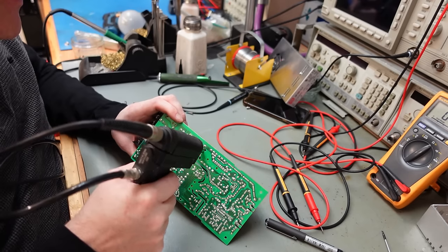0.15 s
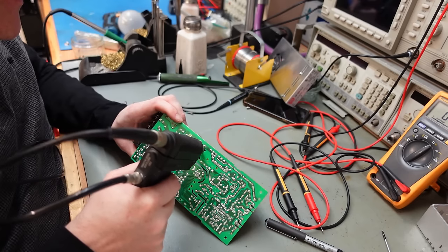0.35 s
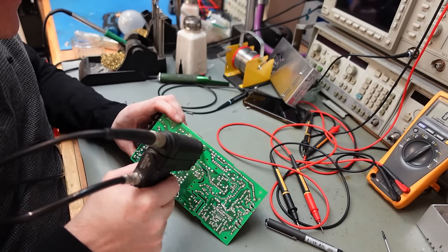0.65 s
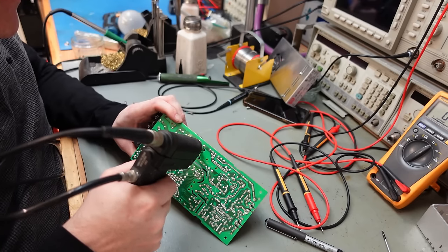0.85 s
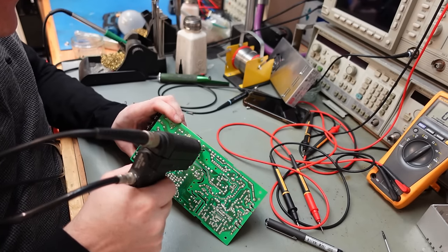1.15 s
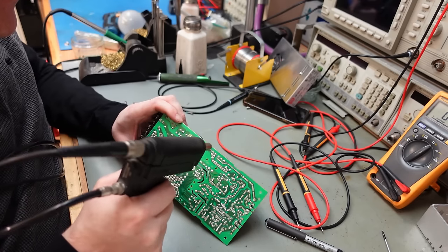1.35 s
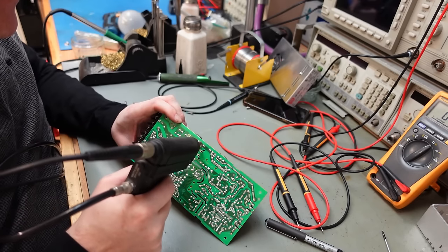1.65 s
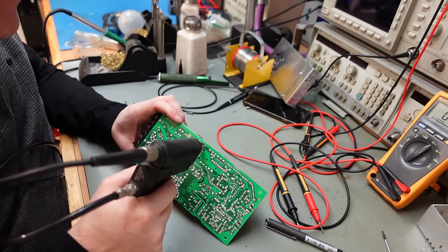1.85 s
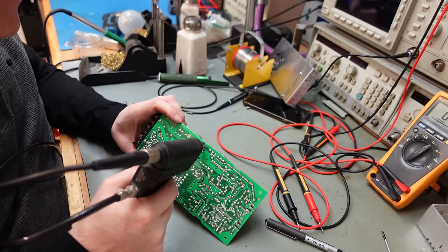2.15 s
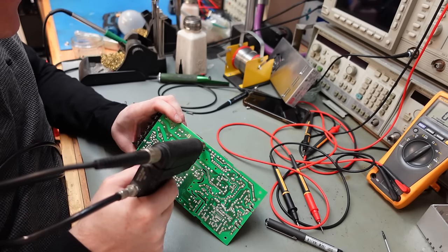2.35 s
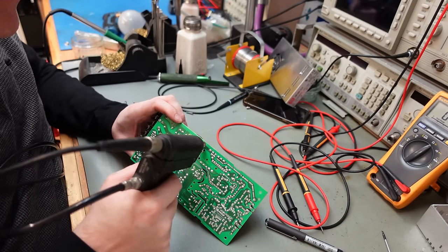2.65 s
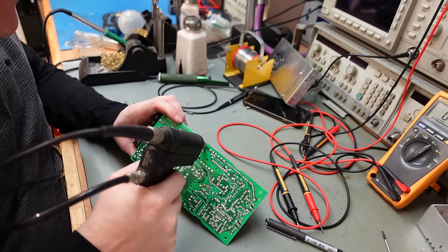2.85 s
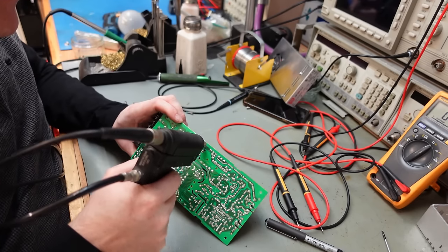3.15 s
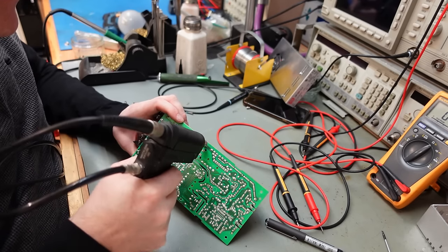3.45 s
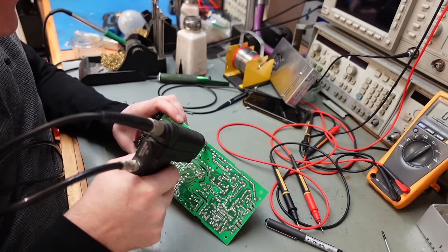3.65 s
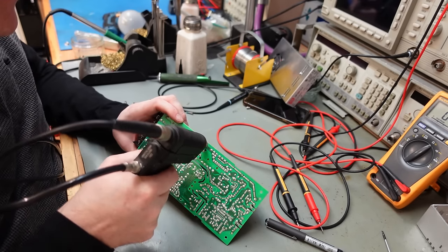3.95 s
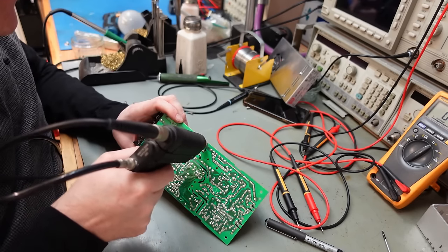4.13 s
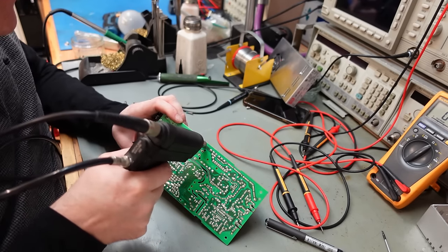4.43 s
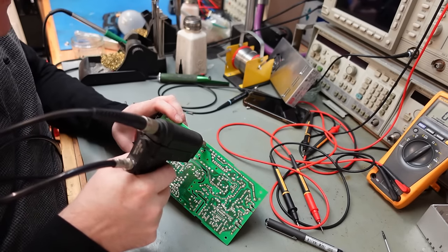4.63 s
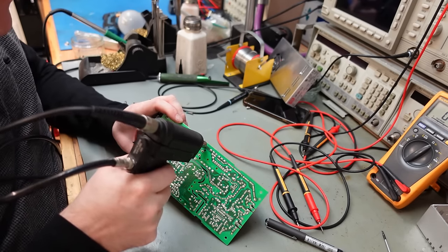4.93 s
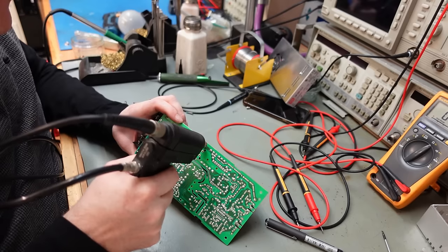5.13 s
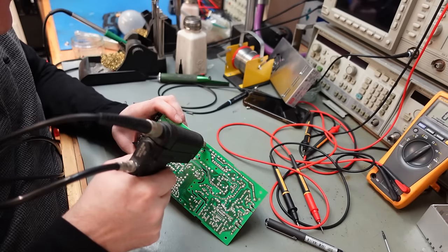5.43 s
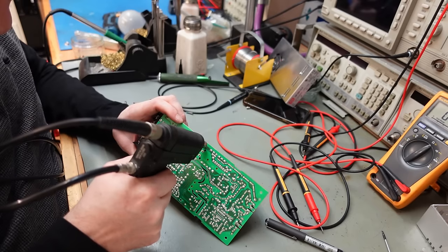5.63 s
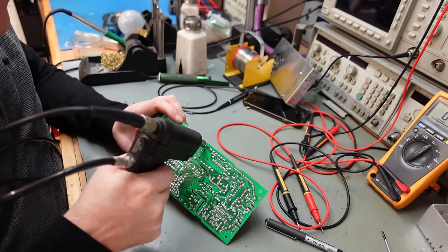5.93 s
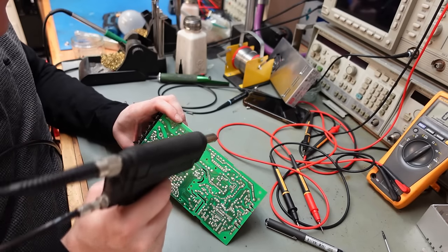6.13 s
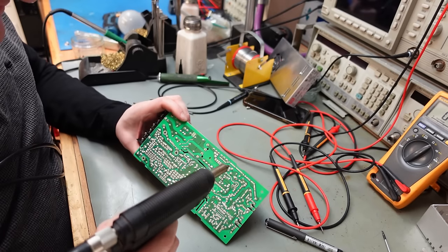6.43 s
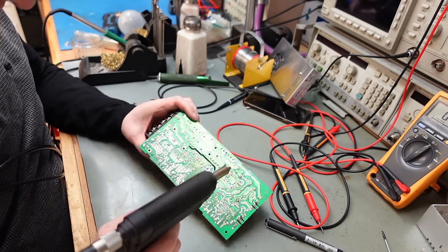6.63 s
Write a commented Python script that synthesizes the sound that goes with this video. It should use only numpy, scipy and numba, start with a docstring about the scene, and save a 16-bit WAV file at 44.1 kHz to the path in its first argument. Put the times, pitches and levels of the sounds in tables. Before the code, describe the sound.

An air-driven desoldering gun taps lightly on a circuit board, then its valve pops open and air hisses loudly for about half a second before popping shut. Scattered small clicks and scrapes follow. After a sharper tap comes a second, slightly longer hiss, then a few more clicks and a brief sleeve rustle. The sound is close, in a small workshop with faintly humming equipment.

```python
"""Desoldering gun at a workbench

An air-driven desoldering gun taps and scrapes on a circuit board, and a sleeve rustles as it moves.
Twice the valve pops open, air hisses through the gun, and the valve pops shut with the hose ringing.
Bench equipment hums faintly in the small workshop. A limiter holds the loud hiss down."""
import sys
import numpy as np
from scipy import signal
from scipy.fft import rfft, irfft
from scipy.io import wavfile
from scipy.ndimage import uniform_filter1d
from numba import njit

SR = 44100
rng = np.random.default_rng(int(sys.argv[2]) if len(sys.argv) > 2 else 0)


def wav_out(sig):
    """Save sig, one row per channel (or a flat mono array), as 16-bit PCM at SR to the path in sys.argv[1]."""
    wavfile.write(sys.argv[1], SR, np.round(np.clip(np.atleast_2d(sig).T, -1, 1) * 32767).astype(np.int16))


N = 299439
TIME = np.arange(N) / SR
FREQ = np.maximum(np.fft.rfftfreq(N, 1 / SR), 1)

# Tone of the workshop's steady air noise: f/Hz, relative level/dB
FAN_SPECTRUM = [(20, -7.5), (50, 2.5), (130, -1.5), (330, -3), (560, -6.5), (820, -6), (1400, -9.5),
                (1590, -3.5), (1750, -12.5), (3500, -15.5), (4400, -20.5), (7500, -20.5), (10000, -25),
                (15500, -27)]
# Mains hum and fan whine of the bench equipment: f/Hz, level/dB
HUM_TONES = [(199.5, -65), (301.5, -68), (336, -62.5), (499, -68), (699.8, -64.5), (850.6, -67),
             (2094, -69.5), (2293, -77), (2891, -66.5)]
# Tone of sliding cloth: f/Hz, relative level/dB
CLOTH_SPECTRUM = [(200, 1.5), (800, 4), (2100, 5.5), (3600, 3), (5000, -10), (9000, -14.5), (15500, -25.5)]
# Slides of the sleeve and hose: middle t/s, half length/s, level/dB
SLEEVE_MOVES = [(0.137, 0.064, -53), (0.59, 0.14, -50.5), (4.985, 0.06, -52.5), (6.67, 0.14, -49),
                (6.79, 0.046, -35)]
# Knocks of the nozzle, trigger and fingers:
# t/s, relative level/dB, most boosted f/Hz, tick against the knock/dB, thump against the knock/dB
KNOCKS = [(0.006, -22, 3220, -25, -7), (0.261, -23.5, 2470, -23, -11), (0.387, -18.5, 2250, -33, -13.5),
          (0.525, -11.5, 2400, -24, -17.5), (0.542, -12, 2040, -26, -23), (0.615, -18, 2450, -33, -17.5),
          (0.642, -19.5, 3690, -22, -15), (1.772, -27.5, 1780, -28, -28), (1.872, -36, 1900, -18, -13),
          (1.887, -27, 1990, -33, -25), (1.908, -30.5, 1840, -28, -12), (2.246, -12, 2050, -22, -17),
          (2.318, -30, 2300, -30, -6), (2.386, -19.5, 2070, -29.5, -16), (2.429, -32.5, 1730, -27, -1.5),
          (2.76, -46, 3300, -8, -12), (3.62, -44.5, 3200, -8, -16), (4.294, -40, 3300, -11, -8),
          (4.836, -18, 1950, -15, -9), (4.844, -8.5, 3280, -3.5, -22.5), (5.052, -31.5, 2170, -13.5, -2.5),
          (5.13, -28, 1730, -11, -9.5), (5.142, -28.5, 2860, -0.5, -9), (5.382, -31, 2400, -34, -28),
          (6.473, -28.5, 1000, -38, -32), (6.546, -33.5, 3050, -41, -27), (6.601, -55, 7500, 25.5, -25),
          (6.706, -17, 3630, -14, -37), (6.7374, -13, 1360, -40, -20)]
# Resonances of the board and gun body: f/Hz, width/Hz, relative level/dB
BOARD_MODES = [(430, 150, 10.5), (860, 640, 9.5), (1535, 210, 0), (1735, 110, 3.5), (1960, 170, -3),
               (2147, 130, 5.5), (2520, 37, 2), (3290, 590, -3.5), (4080, 450, -9.5), (5600, 430, -33.5),
               (7100, 270, -4.5)]
# Tone of the nozzle ticking on solder: f/Hz, relative level/dB
TICK_SPECTRUM = [(1500, -15), (3500, -11), (5200, -1.5), (6700, -4), (8600, -3.5), (10500, -9),
                 (15500, -15)]
# Trigger pulls: valve opens t/s, valve shuts t/s, hiss level/dB, change over the pull/dB
TRIGGER_PULLS = [(0.835, 1.4385, -5.5, -0.5), (5.3886, 6.1384, -2, -3.5)]
# Pressure pulses of the valve, opening then shutting:
# f/Hz, level/dB, half length/s, low push against the pulse/dB, hose ring against the pulse/dB
VALVE_POPS = [(483, 1.5, 0.0014, -17, -15.5), (540, 10.5, 0.00098, -38.5, -21.5)]
# Tone of the ringing hose: f/Hz, relative level/dB
HOSE_SPECTRUM = [(30, -40), (150, -21.5), (450, -11), (850, 4), (1600, -18.5), (5000, -46.5)]
# Broad tone of the air jet: f/Hz, relative level/dB
JET_SPECTRUM = [(200, -32.3), (300, -20.9), (480, -10.6), (800, -6.9), (1300, -7.2), (1800, -1.3),
                (3000, 0.0), (4300, -4.2), (5400, -4.2), (6500, -4.0), (7500, -3.4), (8600, -14.2),
                (10500, -7.0), (15600, -9.7)]
# Resonances of the air path, which change with the grip:
# f/Hz, width/Hz, boost in first pull/dB, boost in second pull/dB
AIR_RESONANCES = [(520, 80, 5.3, 6.7), (700, 130, 3.8, 5.2), (1040, 210, 7.6, 6.7), (1580, 250, 6.4, 6.0),
                  (2000, 90, 4.5, 2.8), (2220, 40, 2.8, 2.4), (2570, 70, 7.0, 5.2), (2980, 160, 4.4, 3.3),
                  (3200, 90, 5.8, 5.9), (3340, 50, 5.9, 0.7), (3470, 180, 9.6, 10.6),
                  (3710, 220, -1.6, 2.9), (3760, 310, 11.0, 8.4), (4480, 160, 2.9, 4.1),
                  (4890, 50, 6.0, 6.9), (5860, 290, 2.6, 5.7), (6150, 370, 6.6, 7.0), (6700, 390, 5.2, 5.5),
                  (7100, 90, 8.9, 3.5), (7460, 410, 3.3, 4.6), (8350, 410, 11.0, 5.7),
                  (9120, 360, 8.9, 10.9), (9640, 470, 11.0, 5.2), (9790, 430, 2.4, 11.0),
                  (10210, 500, 6.5, -3.0), (11070, 150, 6.6, 5.9), (11520, 140, 3.6, 6.7),
                  (11760, 260, 4.5, 8.3), (12390, 200, 5.8, 2.3), (15150, 270, -3.0, 4.8)]
# The nozzle rim whistles high, then an octave lower, as each pull ends:
# time before the valve shuts/s, half length/s, f/Hz, level against the hiss/dB
RIM_WHISTLES = [(0.075, .025, 9750, -12), (0.036, 0.026, 4905, -11.5)]
# How long the workshop echoes: f/Hz, t60/s (t60 is the time to fade by 60 dB)
ROOM_DECAY = [(150, .3), (600, .28), (2000, .28), (4000, .38), (8000, .38), (15000, .24)]


def undb(db):
    """Turn decibels into a gain."""
    return 10 ** (np.asarray(db) / 20)


def unit(x):
    """Scale to an average strength (rms) of 1."""
    return x / np.sqrt(np.mean(x ** 2))


def contour(points, hz=FREQ):
    """Join (Hz, value) points on a log-frequency axis."""
    at, value = np.transpose(points)
    return np.interp(np.log(hz), np.log(at), value)


def bell(centre, width, hz=FREQ):
    """Power curve of one resonance, 1 at its centre."""
    return 1 / (1 + (2 * (hz - centre) / width) ** 2)


def swell(at, half_s):
    """Smooth rise and fall around one moment."""
    return np.exp(-((TIME - at) / half_s) ** 2)


def noise(db):
    """Noise of rms 1 with the given spectrum."""
    return unit(irfft(rfft(rng.standard_normal(N)) * undb(db), N))


def wander(rate_hz):
    """Smooth random drift, about 1 in size."""
    return noise(-20 * np.log10(1 + (FREQ / rate_hz) ** 2))


def blow(fade, db):
    """A fading burst of noise rings with the given spectrum, never ahead of the hit."""
    cepstrum = irfft(np.log(undb(db)))
    half = len(fade) // 2
    cepstrum[1:half] *= 2
    cepstrum[half + 1:] = 0
    burst = rng.standard_normal(len(fade)) * fade
    ringing = irfft(rfft(burst) * np.exp(rfft(cepstrum)))
    return unit(ringing) * np.sqrt(np.mean(fade ** 2))


@njit
def follow(x, rise_s, fall_s):
    """Track the level of a sound, with separate times for rising and falling."""
    attack, release = 1 / (rise_s * SR), 1 / (fall_s * SR)
    out, level = np.empty(len(x)), 0.
    for i in range(len(x)):
        now = abs(x[i])
        level += (now - level) * (attack if now > level else release)
        out[i] = level
    return out


def workshop(air_db=-50.5, drift_db=0.2, waver_db=0.6):
    """Fans blow evenly while the equipment hums on faint, nearly steady tones."""
    air_gain = undb(air_db + drift_db * wander(6))
    air = noise(contour(FAN_SPECTRUM)) * air_gain
    hum = 0
    for hz, db in HUM_TONES:
        peak = np.sqrt(2) * undb(db + waver_db * wander(5))
        hum += peak * np.sin(2 * np.pi * (hz * TIME + rng.random()))
    return air + hum


def room(x, size=22050, gap_s=0.0061, clutter_db=-13, clutter_t60=0.063, tail_db=-21.5):
    """Sound bounces quickly off the cluttered bench, then leaves a faint tail from the walls."""
    t, hz = np.arange(size) / SR, np.maximum(np.fft.rfftfreq(size, 1 / SR), 1)
    scatter, tail = rfft(rng.standard_normal(size)), 0
    centres, t60s = np.transpose(ROOM_DECAY)
    for share, t60 in zip(np.eye(len(ROOM_DECAY)), t60s):
        band = np.interp(np.log(hz), np.log(centres), share)
        tail += irfft(scatter * band, size) * undb(-60 * t / t60)
    build_up = 1 - np.exp(-(t / gap_s) ** 2)
    clutter = rng.standard_normal(size) * undb(-60 * t / clutter_t60)
    echoes = undb(clutter_db) * unit(clutter * build_up) + undb(tail_db) * unit(tail * build_up)
    return x + signal.fftconvolve(x, echoes / np.sqrt(size))[:N]


def sleeve(grain_db=1.0):
    """Cloth and hose slide in small catches; each move swells and fades."""
    moves = sum(undb(db) * swell(at, half_s) for at, half_s, db in SLEEVE_MOVES)
    return noise(contour(CLOTH_SPECTRUM)) * moves * undb(grain_db * wander(75))


def knocks(size=8192, strike_db=-7, focus_db=21, focus_octaves=1.07, chatter_t60=0.024,
           settle_s=0.022, settle_db=-16.5, tick_t60=0.046, thump_t60=0.16):
    """Each knock rattles the board, with a bright metal tick and a soft thump of the bench."""
    out = np.zeros(N + size)
    t, hz = np.arange(size) / SR, np.maximum(np.fft.rfftfreq(size, 1 / SR), 1)
    board_db = 10 * np.log10(sum(undb(db) ** 2 * bell(f, width, hz) for f, width, db in BOARD_MODES))
    bench_db = contour([(20, -25), (60, -6), (105, 0), (200, -8), (450, -14), (1500, -45)], hz)

    def contact(t60, rise_s=0.00013):
        """A quick rise, then a steady fade."""
        return undb(-60 * np.maximum(t - rise_s, 0) / t60) * (1 - np.exp(-t / rise_s))

    for at, db, bright_hz, tick_db, thump_db in KNOCKS:
        fade = contact(chatter_t60 * 2 ** (-db / 30.5))  # a lighter touch scrapes on for longer
        fade += undb(settle_db) * np.interp(t - settle_s, t, fade)  # the nozzle lands again, softly
        # where and how hard the board is touched decides which resonances ring
        boost_db = focus_db * np.exp(-(np.log2(hz / bright_hz) / focus_octaves) ** 2)
        board = blow(fade, board_db + boost_db)
        tick_hz = 5600 - 92.5 * (db + tick_db)  # a lighter tick rings higher
        tick_tone_db = contour(TICK_SPECTRUM, hz) + 10 * bell(tick_hz, width=1800, hz=hz)
        tick = blow(contact(tick_t60), tick_tone_db)
        thump = blow(contact(thump_t60, rise_s=0.0029), bench_db)  # the hand's weight follows late
        i = int(at * SR)
        out[i:i + size] += undb(db + strike_db) * (board + undb(tick_db) * tick + undb(thump_db) * thump)
    return out[:N]


def valve(hose_t60=0.17, push_s=0.0024, opening_lag_s=0.0025):
    """Each switch of the valve sends out a pressure pulse and a low push, and leaves the hose ringing."""
    out = np.zeros(N)
    hose = noise(contour(HOSE_SPECTRUM))
    for start, stop, _, _ in TRIGGER_PULLS:
        for at, (hz, db, half_s, push_db, ring_db) in zip((start + opening_lag_s, stop), VALVE_POPS):
            t = TIME - at
            pulse = -np.cos(2 * np.pi * hz * t) * swell(at, half_s)
            push = -undb(push_db) * (1 - 2 * (t / push_s) ** 2) * swell(at, push_s)
            ringing = hose * (t > 0) * undb(ring_db - 60 * np.abs(t) / hose_t60)
            out += undb(db) * (pulse + push + ringing)
    return out


def air_jet(rise_s=0.0038, flutter_db=0.72, flutter_hz=25, sway_db=0.13,
            bleed_s=0.078, dull_hz=9700, dull_s=0.058):
    """Swirling air hisses through the gun; once the valve shuts, the trapped pressure leaks away."""
    out = np.zeros(N)
    jet_db = contour(JET_SPECTRUM) - 10 * np.log10(1 + (130 / FREQ) ** 4)  # a thin jet has no bass
    for pull, (start, stop, db, change_db) in enumerate(TRIGGER_PULLS):
        whistles = 0
        for lead_s, half_s, hz, whistle_db in RIM_WHISTLES:
            tone = noise(20 * np.log10(bell(hz, width=90)))
            whistles += tone * undb(whistle_db) * swell(stop - lead_s, half_s)
        path_db = sum(boosts[pull] * bell(hz, width) for hz, width, *boosts in AIR_RESONANCES)
        hiss = noise(jet_db + path_db)
        # the strongest resonance swells and sinks as the nozzle rocks on the joint
        strongest = irfft(rfft(hiss) * bell(3800, width=752), N)
        hiss += (undb(sway_db * wander(1.8)) - 1) * strongest
        # as the pressure drops, the treble dies first
        since_shut = np.maximum(TIME - stop, 0)
        treble = irfft(rfft(hiss) / (1 + (dull_hz / FREQ) ** 4), N)
        hiss -= treble * (1 - np.exp(-since_shut / dull_s))
        opening = 1 - np.exp(-np.maximum(TIME - start, 0) / rise_s)
        progress = np.clip((TIME - start) / (stop - start), 0, 1)
        bleed_db = -20 * (since_shut / bleed_s) ** 1.22  # falls slowly at first, then faster
        flow_db = db + change_db * progress + bleed_db + flutter_db * wander(flutter_hz)
        out += (hiss + whistles) * opening * undb(flow_db)
    return out


def scene():
    """All sources reach one close microphone, the same in both channels."""
    mono = room(air_jet() + valve() + knocks()) + sleeve() + workshop()
    return np.array([mono, mono])


def record(dry, threshold_db=-12.0, slope=0.85, top_hz=15750):
    """A limiter turns the hiss down and ducks under pops; peaks are rounded and the top treble is cut."""
    loudness = np.sqrt(np.abs(uniform_filter1d(dry[0] ** 2, size=132)))  # looks slightly ahead
    slow = follow(loudness, rise_s=0.02, fall_s=0.26)
    quick = follow(loudness, rise_s=0.00047, fall_s=0.031)
    gain = np.minimum(1, undb(threshold_db) / (np.maximum(slow, quick) + 1e-9)) ** slope
    limited = dry * gain
    rounded = limited / (1 + limited ** 4) ** (1 / 4)
    low_pass = signal.ellip(12, .1, 80, top_hz, fs=SR, output="sos")
    return signal.sosfilt(low_pass, rounded)


dry = scene()
out = record(dry)
wav_out(out)
```